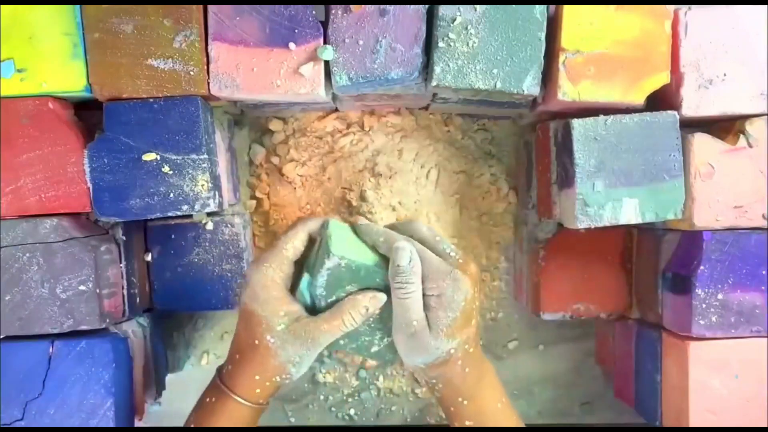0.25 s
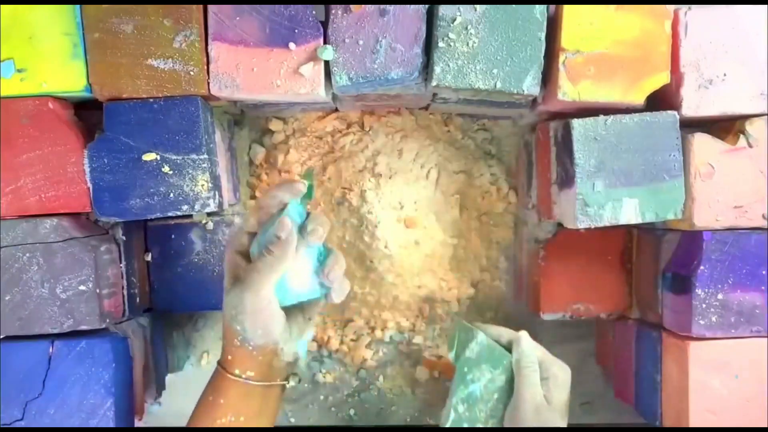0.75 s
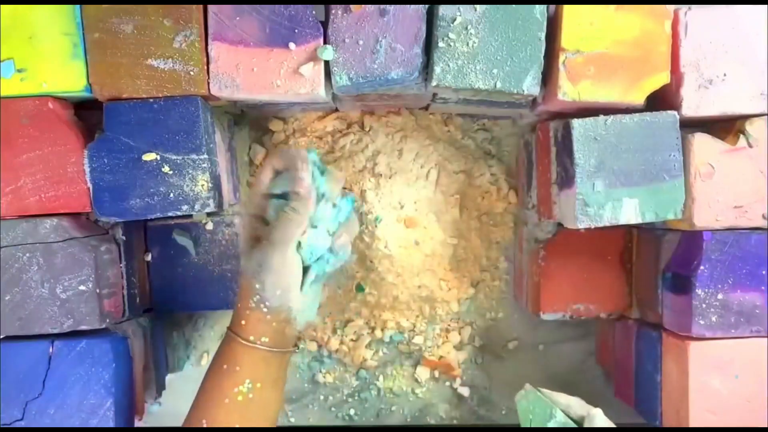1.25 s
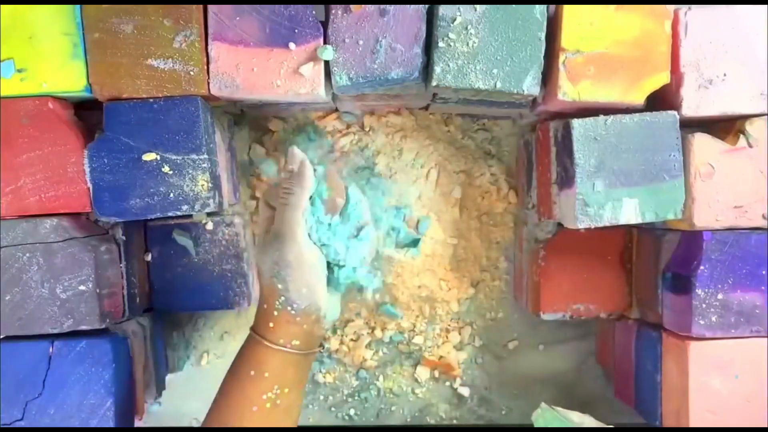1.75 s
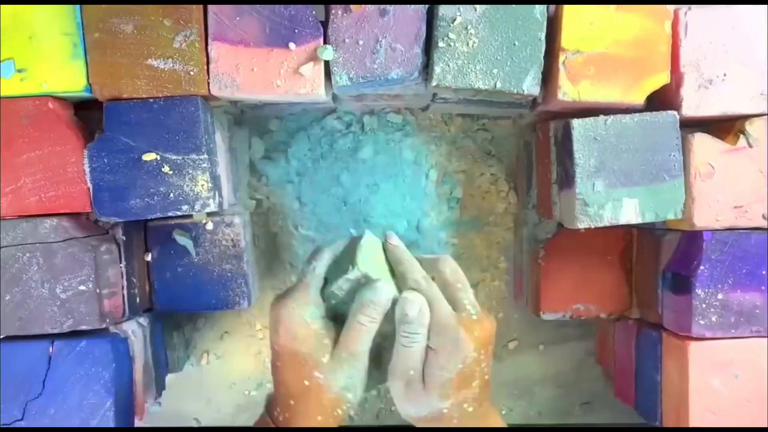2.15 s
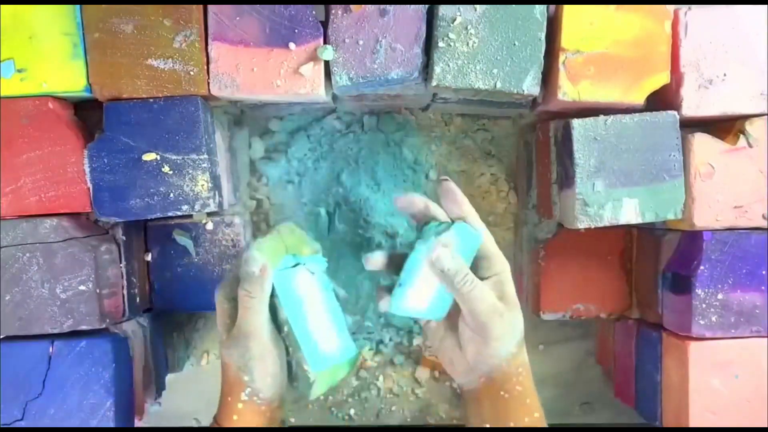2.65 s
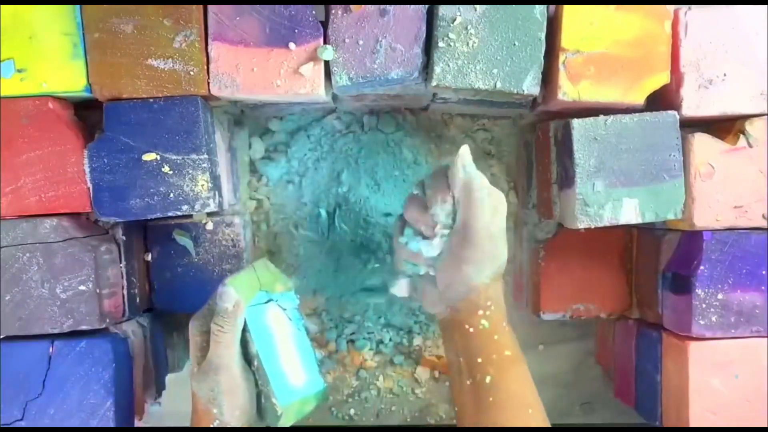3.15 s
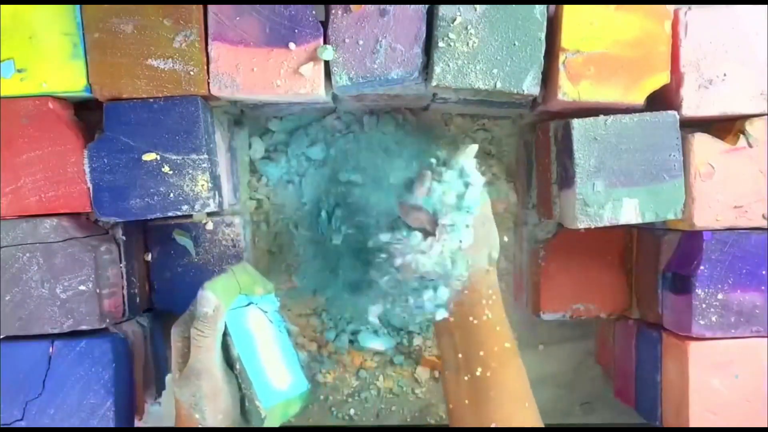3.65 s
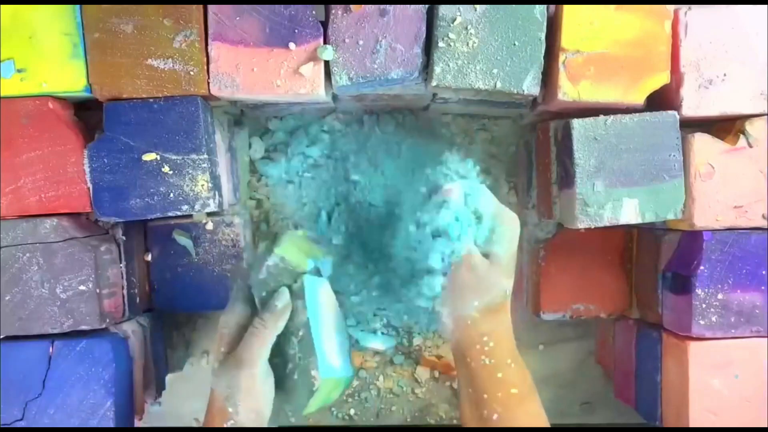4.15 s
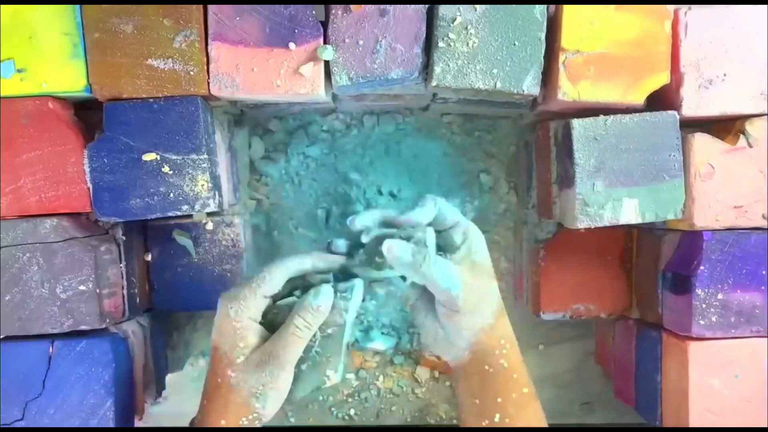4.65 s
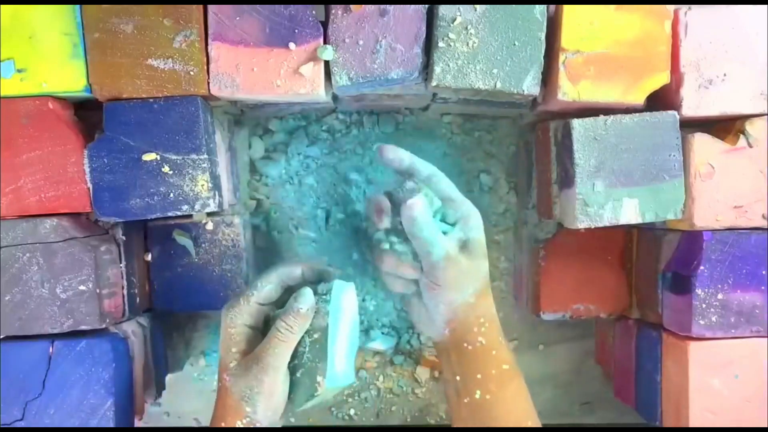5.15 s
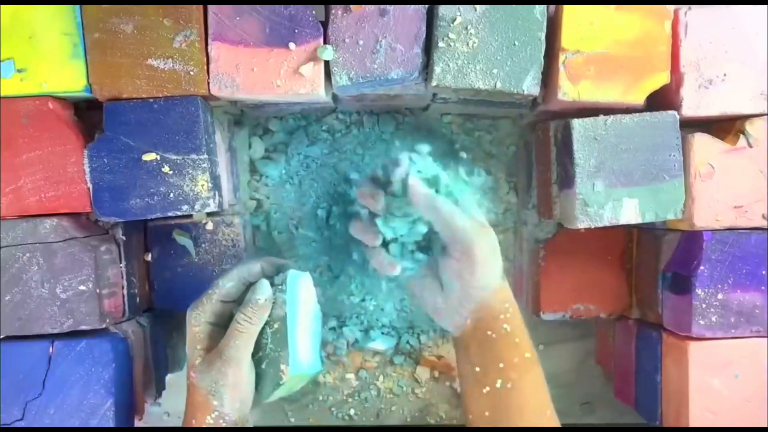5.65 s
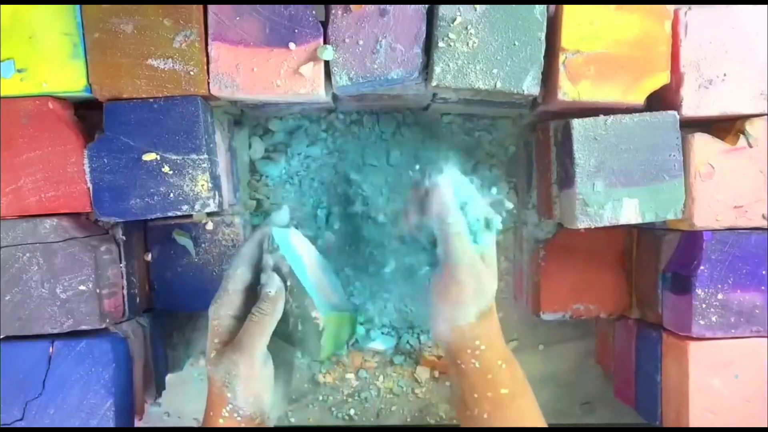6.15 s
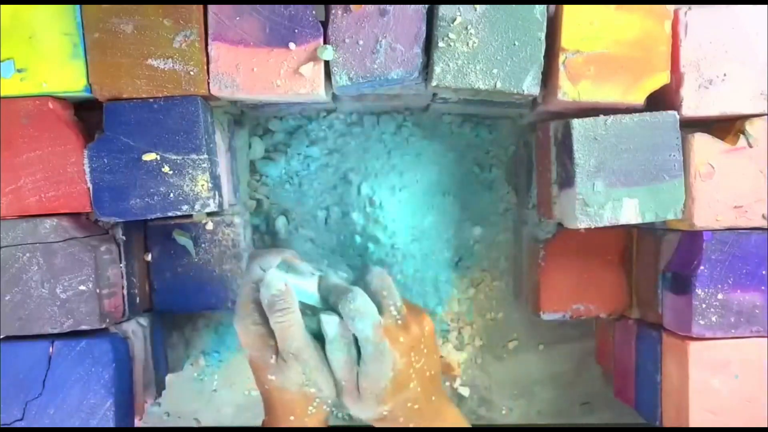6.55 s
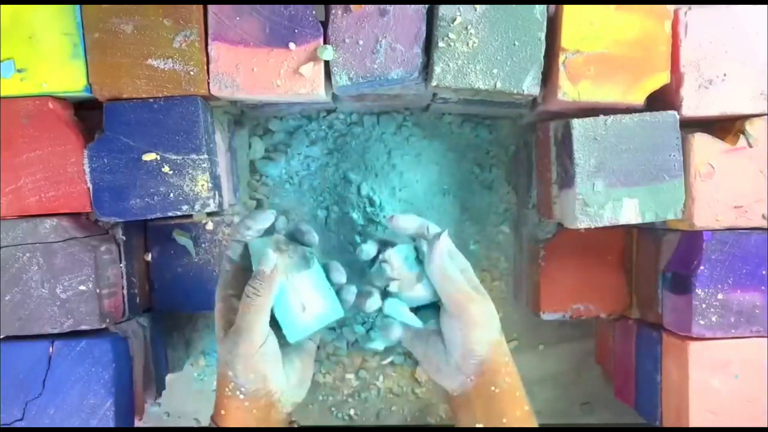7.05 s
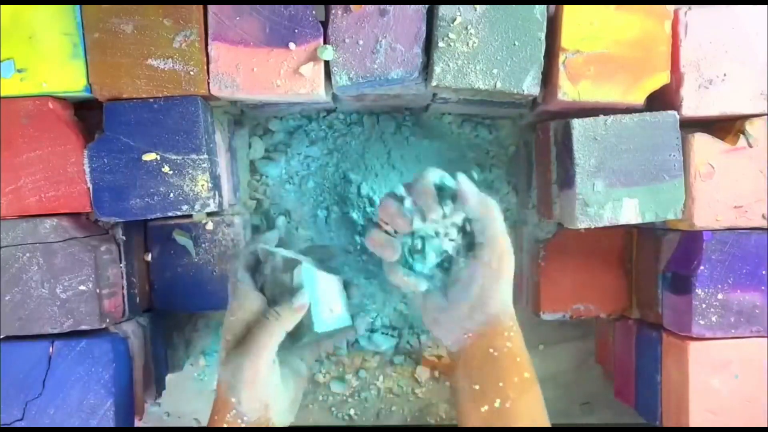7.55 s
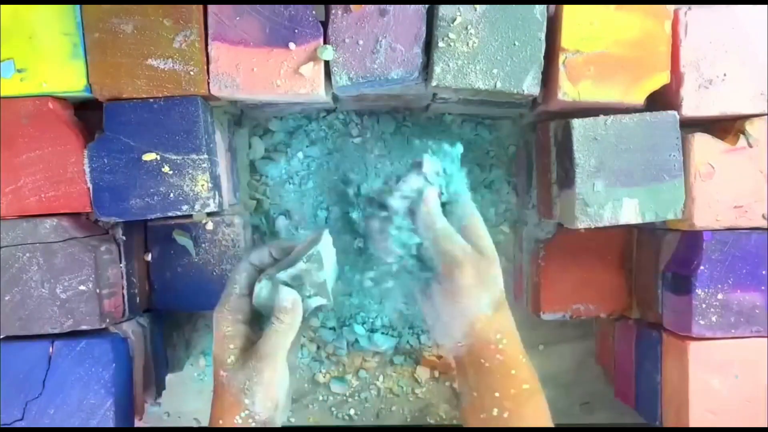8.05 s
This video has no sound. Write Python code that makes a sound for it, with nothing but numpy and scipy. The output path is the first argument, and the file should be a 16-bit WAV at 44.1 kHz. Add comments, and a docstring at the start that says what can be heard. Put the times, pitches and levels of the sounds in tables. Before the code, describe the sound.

Hands break and crush chalk in a quiet room, making sharp brittle snaps, irregular gritty crunches and a trickle of powder.

```python
"""Crushing chalk by hand

Dry chalk blocks are snapped and crushed over a table, close under a pair of microphone ports.
Each brittle fracture releases stored strain as a burst of grit and excites the modes of block and table.
Between fractures, crumbs grind and pour, and a slipping face sometimes squeaks. The cupped hands add
short reflections; the table rumbles under the arms, and a small quiet room sounds faintly behind."""
import sys
import numpy as np
from scipy import signal
from scipy.fft import rfft, irfft, next_fast_len
from scipy.io import wavfile

SR = 44100
rng = np.random.default_rng(int(sys.argv[2]) if len(sys.argv) > 2 else 0)


def to_wav(s):
    """Save 16-bit WAV."""
    ch = np.atleast_2d(s).T  # columns
    pcm = np.round(np.clip(ch, -1, 1) * 32767)  # PCM
    wavfile.write(sys.argv[1], SR, pcm.astype(np.int16))


N = 366030

# spectral density of the room's background: frequency_hz, relative_db
ROOM_SPECTRUM = [(18, -34), (30, -34.5), (101, -4.5), (325, -10.5), (515, -10), (742, -21), (2760, -13.5),
                 (6150, -19.5), (10000, -56), (13000, -63), (22000, -120)]
# hands and arms loading the table: time_s, level_db
RUMBLE_LEVELS = [(0.0, -52.5), (0.44, -64.5), (1.66, -60), (2.08, -63.5), (2.29, -55.5), (2.46, -63),
                 (2.53, -68), (2.77, -61), (3.05, -58), (3.28, -61.5), (4.23, -59), (5.39, -68),
                 (5.52, -71), (7.07, -71.5), (7.35, -63.5), (8.3, -63)]
# crumbs grinding and pouring: time_s, fine_db, coarse_db, lumps_db
CRUMBLE_LEVELS = [(0.0, -48, -40.5, -41), (0.055, -78, -74, -64), (0.11, -80, -66, -52),
                  (0.58, -74, -65, -61.5), (0.78, -60, -59.5, -63), (0.95, -51, -46, -56),
                  (1.16, -65, -57.5, -57), (1.62, -48, -55, -52), (1.92, -65, -51.5, -83),
                  (2.1, -52, -55, -52), (2.26, -75, -48, -56), (2.63, -54, -73, -65),
                  (2.89, -51.5, -58, -76), (3.03, -43, -34.5, -47), (3.26, -51.5, -48, -50.5),
                  (3.72, -63, -52, -52.5), (4.07, -49, -44.5, -58.5), (4.21, -44, -43, -72),
                  (4.39, -67, -55, -63), (4.76, -51, -50.5, -55), (4.87, -86, -63.5, -64.5),
                  (4.92, -41, -46, -54), (5.13, -85, -51, -56.5), (5.34, -38.5, -46, -55),
                  (5.55, -66, -46, -58.5), (5.625, -63, -55, -84), (5.67, -63, -55.5, -72),
                  (5.72, -63.5, -53, -69), (5.85, -60, -49.5, -62), (5.96, -55, -48, -67),
                  (6.2, -44, -49.5, -68), (6.56, -49.5, -62.5, -66.5), (6.91, -48, -58, -66),
                  (7.13, -48.5, -61, -60.5), (7.3, -42.5, -52.5, -68), (7.54, -51, -54, -55.5),
                  (7.67, -55, -49.5, -51), (7.79, -48, -44, -55), (7.87, -51.5, -60, -58),
                  (7.95, -46, -57.5, -83), (8.3, -60.5, -45.5, -54)]
# air in the pit between the stacked blocks: pitch_hz, gain_db, t60_s
PIT_MODES = [(404, -10, 0.069), (493, -7, 0.079), (537, -2.5, 0.12), (572, -1, 0.13)]
# sudden breaks: start_s, grit_db, coarse_re_grit_db, fine_re_grit_db, knock_db, thump_db, t60_s
SUDDEN_BREAKS = [(0.1396, -10, -8, -0.5, -10, -31, 0.12), (0.746, -36.5, -32, -2.5, -59, -63, 0.13),
                 (0.9046, -22.5, -27, -18, -38, -53, 0.098), (0.976, -28, -37, 1.5, -63, -65, 0.089),
                 (1.0411, -26, -9, -7, -44, -65, 0.052), (1.0957, -41, 4, -1, -43, -47, 0.19),
                 (1.1389, -26, -2.5, -3, -34, -37, 0.098), (1.236, -41, -28, -6, -51, -57, 0.05),
                 (1.287, -33.5, 5, -9, -67, -67, 0.042), (1.302, -26, -11, -7.5, -61, -45, 0.33),
                 (1.4264, -39.5, 7.5, -14, -38, -46, 0.11), (1.555, -35.5, -11, -8, -57, -58, 0.11),
                 (1.8074, -39, 1.5, -28, -67, -60, 0.05), (2.3033, -22.5, -23, 5, -51, -53, 0.2),
                 (2.317, -13, -11, -29, -15.5, -27.5, 0.12), (2.5033, -34.5, -19, 2, -59, -59, 0.088),
                 (2.5215, -36, -27, -4, -50, -66, 0.082), (2.845, -10, -15.5, -2, -24, -25, 0.084),
                 (2.903, -32.5, 5, -2, -44, -53, 0.034), (2.951, -15, -4, -6, -21, -27, 0.1),
                 (2.978, -24, -19, -9, -27, -48, 0.057), (2.981, -24, 0, -4, -39, -53, 0.052),
                 (3.02, -34.5, 11, 8, -58, -56, 0.026), (3.0636, -27.5, 2, 1.5, -26, -25, 0.21),
                 (3.0713, -30, 0, 5, -20, -32, 0.037), (3.185, -33, 1, -5, -34, -57, 0.038),
                 (3.207, -26.5, -6, 1.5, -40, -56, 0.11), (3.4514, -48.5, -3, 8, -43, -47, 0.17),
                 (3.468, -34, -12, 1.5, -44, -40, 0.21), (3.717, -38.5, -4, -11, -32, -52, 0.38),
                 (3.9182, -35, 3, -7, -36.5, -53, 0.064), (4.109, -30, -8.5, 1, -43, -62, 0.13),
                 (4.585, -39, -2.5, -11, -49, -55, 0.27), (4.897, -40, -5, -9, -67, -60, 0.25),
                 (4.998, -37, -15, 3, -60, -63, 0.32), (5.055, -35, -5.5, 0, -48, -45, 0.22),
                 (5.097, -30.5, -25, -19, -53, -50, 0.044), (5.1332, -35, -3.5, 3, -65, -66, 0.13),
                 (5.143, -42.5, 8, -14, -62, -60, 0.048), (5.201, -14, -3, -6, -23.5, -42, 0.054),
                 (5.276, -31, -22, 11.5, -66, -61, 0.064), (5.3117, -23.5, -14.5, -4, -63, -60, 0.065),
                 (5.3566, -14, -5, -3, -34, -40, 0.12), (5.441, -53, -37, 6.5, -46, -54, 0.052),
                 (5.7677, -41.5, 9, -31, -42, -52, 0.14), (6.0116, -43, 1, -12, -53, -75, 0.28),
                 (6.435, -34.5, -34, 3, -61, -67, 0.043), (6.4523, -38, -49, 5, -64, -70, 0.2),
                 (6.5918, -24.5, -39, -12.5, -77, -74, 0.037), (6.6082, -25.5, -43, -7, -76, -70, 0.13),
                 (6.641, -17, -24, 1, -61, -66, 0.04), (6.6586, -3, -17.5, -4, -36, -61, 0.05),
                 (6.6735, -14, -4.5, -5, -23, -40, 0.14), (6.8, -32.5, -20, -18, -62, -74, 0.076),
                 (7.0794, -38, -36, -6, -46.5, -55, 0.17), (7.223, -46.5, 4, -13, -53, -60, 0.091),
                 (7.244, -30.5, -39, 8, -68, -66, 0.064), (7.3025, -35, -31, -16, -67, -66, 0.25),
                 (7.3169, -37, -7.5, -4, -38.5, -48, 0.19), (7.339, -35, -16, 0, -63, -46, 0.11),
                 (7.4058, -31.5, 0.5, -19, -42, -55, 0.11), (7.436, -37.5, -4, -15, -52, -46, 0.14),
                 (7.4846, -27, -26, -11, -44, -62, 0.039), (7.629, -34, -15, -5, -48, -65, 0.17),
                 (7.688, -44.5, 10, -29, -40, -44, 0.043), (7.7365, -59, 15, -18, -50, -49, 0.04)]
# squeezes that build until the chalk gives way: peak_s, then the columns of SUDDEN_BREAKS from grit_db on
SLOW_BREAKS = [(0.0219, -38, -1.5, -2, -39, -59, 0.13), (0.4335, -32.5, -29, 1, -42, -68, 0.84),
               (0.5944, -46, -21, -3, -47, -61, 0.14), (0.6467, -58.5, 8, -16, -50, -40, 0.14),
               (0.7813, -32.5, -1.5, -33, -30, -51, 0.16), (0.815, -38, -27, 3, -44, -49, 0.11),
               (0.8797, -22, -7, -5.5, -27, -44, 0.11), (1.056, -35.5, -16, -4, -58, -56, 0.56),
               (1.109, -38.5, 2, -3, -37, -40, 0.21), (1.477, -39, -4, -20, -34, -42, 1),
               (1.616, -36.5, -2.5, -19, -39, -43, 0.3), (1.6685, -37.5, -1, -17, -23.5, -41, 0.26),
               (1.8554, -37.5, 2, -8, -40.5, -53, 0.26), (2.1035, -35, -4.5, -35, -34.5, -36, 0.76),
               (2.5367, -24, -30, -3, -57, -70, 0.16), (2.6604, -39, -34, 2.5, -45, -56, 0.17),
               (2.706, -48, -3, -18, -46, -54, 0.11), (2.861, -26.5, -19, -10, -35, -46, 0.25),
               (3.226, -28.5, -12.5, -7, -47, -48, 0.13), (3.517, -47.5, 5, 4, -43, -42, 0.77),
               (3.7814, -50.5, 2, -2, -36, -39, 0.22), (3.9717, -46, 10.5, -15, -32.5, -56, 0.17),
               (4.0318, -44, -1.5, 10, -42, -67, 0.28), (4.1798, -34, -17, 2, -33, -41, 0.99),
               (4.248, -38, -7, 1, -50, -62, 0.37), (4.2995, -23, -21, -2, -74, -60, 0.14),
               (4.4355, -37.5, -0.5, -23, -33.5, -48, 0.27), (4.5253, -42, -11, 4, -59, -48, 0.11),
               (4.5996, -38, -36, 6, -31.5, -46, 0.36), (4.657, -39.5, -14, -2, -61, -41, 0.73),
               (4.741, -33, -23, 3, -61, -70, 0.33), (4.967, -29, -10.5, -1, -58, -67, 0.15),
               (5.227, -23.5, -10, -0.5, -43, -47, 0.16), (5.4532, -29.5, -12.5, -2.5, -39, -66, 0.27),
               (6.022, -39, -7.5, -3, -38, -58, 0.25), (6.283, -35.5, -29, -12, -54, -64, 0.28),
               (6.4634, -34, -32, -6, -55, -75, 1), (6.84, -38, -20, -2, -73, -69, 0.46),
               (6.988, -28.5, -23.5, -0.5, -70, -69, 0.68), (7.1714, -30.5, -26, -7, -56, -56, 0.17),
               (7.518, -40, -5, -16, -53, -65, 0.29), (7.76, -33.5, -8, -6, -42, -51, 0.29),
               (7.9219, -40.5, -2, -7, -33.5, -56, 0.89), (8.221, -56, 13, -21, -40.5, -56, 0.93)]
# small chalk pieces: pitch_hz, gain_db, t60_s
PIECE_MODES = [(773, -5.5, 0.005), (1020, 9, 0.0081), (1678, 7, 0.023), (1984, 20.5, 0.0032),
               (2690, 4, 0.0048)]
# the block in the hands: pitch_hz, gain_db, t60_s
BLOCK_MODES = [(291, -7, 0.13), (387, -14.5, 0.088), (406.5, 0.5, 0.072), (490, -7.5, 0.1),
               (745, -2, 0.026), (976, -2, 0.022), (1132, -3.5, 0.051)]
# the table top: pitch_hz, gain_db, t60_s
TABLE_MODES = [(74, -17, 0.17), (119, -4.5, 0.1), (156.5, -4, 0.091), (198, 5, 0.082)]
# brittle snaps: start_s, peak_db, pitch_hz, t60_s
BRITTLE_SNAPS = [(0.1396, -6, 9500, 0.025), (0.7467, -28, 13400, 0.027), (0.7784, -27.5, 3160, 0.019),
                 (0.8, -25, 13900, 0.027), (0.8765, -27, 3380, 0.03), (0.9774, -19.5, 8620, 0.022),
                 (1.04, -29, 4830, 0.027), (1.0969, -45, 5600, 0.02), (1.1425, -19, 3570, 0.063),
                 (1.235, -39, 7300, 0.027), (1.3005, -32, 7050, 0.027), (1.5563, -22.5, 8600, 0.015),
                 (1.804, -28, 3340, 0.025), (1.8515, -40, 6800, 0.02), (2.3158, 2, 12300, 0.021),
                 (2.3164, -2.5, 4470, 0.023), (2.5233, -20, 7300, 0.051), (2.8473, -2, 3200, 0.082),
                 (2.9497, -12.5, 6360, 0.022), (2.977, -12, 3170, 0.025), (3.021, -23, 3240, 0.027),
                 (3.07, -14.5, 3640, 0.027), (3.205, -18, 13600, 0.027), (3.4517, -25, 14300, 0.027),
                 (3.4712, -19, 8550, 0.027), (3.9177, -36, 2820, 0.024), (4.094, -36, 9490, 0.027),
                 (4.1126, -20.5, 9350, 0.024), (4.286, -26, 6000, 0.027), (4.999, -23, 8050, 0.021),
                 (5.13, -25, 13200, 0.027), (5.143, -22, 2020, 0.017), (5.201, -20, 2720, 0.035),
                 (5.224, -12, 14400, 0.027), (5.274, -16.5, 9500, 0.025), (5.3063, -21, 8000, 0.029),
                 (5.3572, -17.5, 8200, 0.027), (5.443, -10.5, 14500, 0.015), (5.768, -32, 2770, 0.024),
                 (6.451, -17, 8200, 0.046), (6.608, -17.5, 7660, 0.02), (6.6424, -11, 3600, 0.027),
                 (6.6582, 1.5, 8700, 0.017), (7.077, -24.5, 6400, 0.052), (7.166, -30, 7000, 0.02),
                 (7.2424, -22, 6950, 0.041), (7.2535, -25, 7500, 0.02), (7.299, -20, 6200, 0.046),
                 (7.3172, -36, 790, 0.011), (7.3403, -24, 7000, 0.027), (7.354, -28, 7000, 0.022),
                 (7.408, -35, 3670, 0.027), (7.436, -31.5, 990, 0.017), (7.4844, -38, 6240, 0.027),
                 (7.5194, -45, 7630, 0.027), (7.629, -23.5, 7360, 0.027), (7.7356, -32, 1300, 0.01),
                 (7.7588, -24.5, 3200, 0.04), (7.777, -31, 4700, 0.027)]
# heavy breaks jerking the hands against the table: start_s, thud_db, initial_pitch_hz, t60_s, piece_db
HAND_THUDS = [(0.1411, -13.5, 220, 0.075, -14.5), (2.32, -21.5, 215, 0.11, -39),
              (2.5, -42.5, 119, 0.17, -64), (2.538, -47, 148, 0.12, -62), (2.846, -25.5, 248, 0.052, -46),
              (2.9023, -43, 250, .05, -27), (2.95, -23.5, 270, 0.076, -10.5),
              (2.983, -28, 270, 0.043, -15.5), (3.022, -44, 270, .05, -27),
              (3.0695, -13.5, 290, 0.067, -16), (5.201, -27, 300, 0.05, -16.5),
              (5.357, -42, 302, 0.041, -37), (6.674, -28, 395, 0.071, -21)]
# chalk faces singing as they slip: start_s, length_s, pitch_hz, level_db
SLIPS = [(1.126, 0.036, 1715, -24.5), (6.962, 0.067, 4520, -36.5), (6.996, 0.089, 2720, -50),
         (7.069, 0.039, 2700, -52)]
# phase of the left port ahead of the right: frequency_hz, lead_rad
PORT_LEAD = [(0, 0), (250, .4), (800, .6), (1600, 0), (3000, 1), (4500, 0), (8000, 0), (11100, -np.pi),
             (13800, -2 * np.pi)]
# level difference between the ports: frequency_hz, left_re_right_db
PORT_TILT = [(60, -4), (200, -1), (400, 0.5), (1500, 2.5), (3000, -0.5), (5500, 5.5), (9000, 0.9),
             (15000, -0.5)]
# grains that only one port hears: frequency_hz, own_re_shared_db
PORT_OWN_SHARE = [(60, -13.5), (300, -5.5), (900, -0.5), (1500, 10), (6500, 20), (9000, 28), (11100, -14),
                  (13000, -7.5)]
# frequency response of the microphone: frequency_hz, gain_db
MIC_RESPONSE = [(30, 2.5), (70, 4), (200, -0.5), (500, 3.5), (1200, -3), (2500, -3), (5000, -4),
                (8500, 1.5), (11000, -3), (15600, -7), (16000, -19), (16700, -13)]

ROOM_DB = -66.5
SHUDDER_DB, SHUDDER_T60_S = -18.5, 0.29   # the table shakes on after each thump
SUDDEN_CREAK_DB, SLOW_CREAK_DB = -19.5, -6.5   # strength of the creak ahead of a break
CREAK_T60_S, CREAK_PER_DECAY = 0.021, 0.32   # the build-up is longer for breaks that decay slowly
BREAK_RISE_S, GRIND_DB = 0.00036, -14   # time to run through the block; grinding re the knock
SNAP_TEARS_PER_S, SNAP_CLICK = 9000, 1.6   # rate of the small tears; size of the leading one
SNAP_BAND_RATIO, SNAP_RISE_S = 1.57, 0.00013   # the band extends by this ratio either side of the pitch
SNAP_DECAY_POWER = 1.15   # above 1 a snap holds briefly, then stops short
THUD_SAG, THUD_SAG_S, THUD_RISE_S = 0.333, 0.01245, 0.0034   # pitch sinks to the share THUD_SAG
PIECE_HZ, PIECE_T60_S = 968, 0.053
BLOCK_HZ, BLOCK_T60_S, BLOCK_DB = 387, 0.052, 2   # level re the thud
CUP_DB, CUP_T60_S = -5, .014   # reflections re the direct sound
STOPBAND_HZ = 16900


def amp(db):
    """Amplitude ratio of a level in decibels."""
    return 10 ** (np.asarray(db) / 20)


def unit_rms(x):
    """Normalisation to unit mean power."""
    return x / np.sqrt(np.mean(x ** 2) + 1e-20)


def in_time(rows):
    """Linear interpolation of each level column at every sample."""
    times, *columns = np.transpose(rows)
    return [np.interp(np.arange(N) / SR, times, column) for column in columns]


def at_hz(points, hz):
    """Interpolation of a spectrum on a logarithmic frequency axis."""
    knots_hz, level_db = np.transpose(points)
    return np.interp(np.log(hz + 1), np.log(knots_hz + 1), level_db)


def band(x, low_hz, high_hz, passes=1):
    """Butterworth band-pass; each pass steepens the skirts."""
    sos = signal.butter(2, [low_hz, min(high_hz, .45 * SR)], "band", fs=SR, output="sos")
    for _ in range(passes):
        x = signal.sosfilt(sos, x)
    return x


def drift(rate_hz):
    """Low-passed noise: a slow random fluctuation of unit rms."""
    knots_per_s = 200
    noise = rng.standard_normal(int(N / SR * knots_per_s))
    pole = np.exp(-2 * np.pi * rate_hz / knots_per_s)
    knots = unit_rms(signal.lfilter([1], [1, -pole], noise))
    return np.interp(np.linspace(0, len(knots) - 1, N), np.arange(len(knots)), knots)


def grit(per_s, spread_db):
    """Tiny fractures as a Poisson process, most small, a few large; rows: both ports, left, right."""
    sizes = amp(spread_db * np.minimum(rng.exponential(1, (3, N)), 4)) * rng.choice([-1, 1], (3, N))
    return unit_rms(sizes * (rng.random((3, N)) < per_s / SR))


def ring(x, modes, uneven_db):
    """Superposition of damped modes; the excitation of each varies as the grip moves."""
    out = 0
    for hz, gain_db, t60 in modes:
        radius, angle = amp(-60 / (t60 * SR)), 2 * np.pi * hz / SR
        struck = x * amp(gain_db + uneven_db * drift(1.9)) + 1e-18
        out = out + signal.lfilter([0, np.sin(angle)], [1, -2 * radius * np.cos(angle), radius ** 2], struck)
    return out


def breaks():
    """Brittle failure, sudden or slow: one row of time, levels and decay for each break."""
    rows = [(*row, SUDDEN_CREAK_DB) for row in SUDDEN_BREAKS]
    rows += [(*row, SLOW_CREAK_DB) for row in SLOW_BREAKS]
    peak_s, grit_db, coarse_db, fine_db, knock_db, thump_db, t60, creak_db = np.transpose(rows)
    three_grits_db = grit_db + coarse_db, grit_db, grit_db + fine_db
    return np.transpose([peak_s, thump_db, knock_db, *three_grits_db, creak_db, t60])


def room_tone():
    """Stationary background noise, uncorrelated between the ports."""
    gain = amp(at_hz(ROOM_SPECTRUM, np.fft.rfftfreq(N, 1 / SR)))
    return amp(ROOM_DB) * unit_rms(irfft(rfft(rng.standard_normal((2, N))) * gain, N))


def table_rumble():
    """Forced vibration of the table under the arms, with an exponential shudder after each thump."""
    load_db, = in_time(RUMBLE_LEVELS)
    peak_s, thump_db = breaks().T[:2]
    jolts = np.zeros(N)
    jolts[(peak_s * SR).astype(int)] = amp(thump_db + SHUDDER_DB)
    shudder = signal.lfilter([1], [1, -amp(-60 / (SHUDDER_T60_S * SR))], jolts)
    noise = unit_rms(band(rng.standard_normal((3, N)), 55, 170))
    return noise * (amp(load_db) + shudder) * amp(2.5 * drift(8))


def crumble():
    """Granular flow: many small impacts merge into hiss and crunch; falling lumps excite the pit."""
    fine_db, coarse_db, lumps_db = in_time(CRUMBLE_LEVELS)
    clumps = drift(25)
    powder = rng.standard_normal((3, N)) + 0.6 * grit(per_s=500, spread_db=5.5)
    fine = unit_rms(band(powder, 2170, 14800)) * amp(fine_db + 2.0 * clumps)
    coarse = unit_rms(band(powder, 1000, 5350)) * amp(coarse_db + 1.4 * clumps)
    drops = grit(per_s=500, spread_db=4.0) * amp(clumps + 2.0 * drift(2.2))
    hollow = .8 * unit_rms(ring(drops, PIT_MODES, uneven_db=2.0))
    patter = .6 * unit_rms(band(drops, 300, 700))
    return fine + coarse + unit_rms(patter + hollow) * amp(lumps_db)


def strain_release():
    """Each break builds, clicks and decays exponentially: four grit envelopes and two contact forces."""
    envelopes, forces = np.zeros((4, N + SR)), np.zeros((2, N + SR))
    t = np.arange(SR // 4) / SR
    click = np.array([[.6], [.4], [.6], [.9]]) * amp(-60 * t / 0.011)
    crumbling = 0.029 * amp(-60 * t / 0.31)   # the broken faces go on shedding
    jolt = np.array([t / 0.0011 * np.exp(-t / 0.0014), amp(-60 * t / 0.0017)])   # arm's shove, block's knock
    for peak_s, thump_db, knock_db, coarse_db, medium_db, fine_db, creak_db, t60 in breaks():
        at = round(peak_s * SR)
        levels = amp([[coarse_db], [medium_db], [fine_db], [knock_db + GRIND_DB]])
        sudden = 1 - amp(creak_db)   # a break without warning clicks hardest
        rise = 1 - sudden * np.exp(-t / BREAK_RISE_S)
        shower = amp(-60 * t / np.clip(t60, .01, .25))
        envelopes[:, at:at + len(t)] += levels * rise * (sudden * click + shower + crumbling)
        lead = min(at, SR // 8)
        creak = amp(creak_db + 3.5 - 60 * t[lead:0:-1] / (CREAK_T60_S + CREAK_PER_DECAY * t60))
        envelopes[:, at - lead:at] += levels * creak
        forces[:, at:at + len(t)] += amp([[thump_db], [knock_db]]) * jolt * [[1], [sudden]]
    return envelopes[:, :N], forces[:, :N]


def fractures():
    """Impulsive excitation: each break sheds grit in three sizes and rings pieces, block and table."""
    envelopes, (table_force, block_force) = strain_release()
    coarse, medium, fine, grinding = envelopes[:, None] * grit(per_s=7000, spread_db=4.0)
    pieces = amp(-35.5) * band(ring(coarse, PIECE_MODES, uneven_db=3.0), 270, 4700)
    crunch = amp(7.0) * band(coarse, 714, 1510)
    bright = amp(1.5) * band(medium, 2490, 7640, passes=2) + amp(1.0) * band(fine, 11080, .45 * SR)
    rough_contact = np.array([[1.2], [.8], [-.8]]) + .7 * rng.standard_normal((3, N))
    knock = amp(-25.0) * ring(block_force * rough_contact + grinding, BLOCK_MODES, uneven_db=2.5)
    shove = table_force * [[1], [1], [-1]]   # the table flexes differently under each port
    thump = amp(-36) * ring(shove, TABLE_MODES, uneven_db=-5.5)
    # knock stays above about 200 Hz and thump above about 65 Hz, with steep skirts
    bodies = band(knock, 206, 3400, passes=2) + band(thump, 65, 590, passes=2)
    return pieces + crunch + bright + bodies


def snaps():
    """Fast crack growth in a dry piece: one sharp tear, then smaller ones, in a band around its pitch."""
    out, t = np.zeros((3, N + SR)), np.arange(SR // 10) / SR
    rise = 1 - np.exp(-t / SNAP_RISE_S)
    for start_s, peak_db, hz, t60 in BRITTLE_SNAPS:
        tears = rng.standard_normal((3, len(t))) * (rng.random((3, len(t))) < SNAP_TEARS_PER_S / SR)
        tears[:, round(2 * SNAP_RISE_S * SR)] = SNAP_CLICK
        decay = amp(-60 * (t / t60) ** SNAP_DECAY_POWER)
        burst = band(tears * rise * decay, hz / SNAP_BAND_RATIO, hz * SNAP_BAND_RATIO, passes=2)
        at = round(start_s * SR)
        out[:, at:at + len(t)] += amp(peak_db) * burst / np.abs(burst).max(axis=1).mean()
    return out[:, :N]


def thuds():
    """Soft impact: the pitch sinks as the contact spreads, while block and held piece ring briefly."""
    out, t = np.zeros(N + SR), np.arange(SR // 4) / SR
    rise = 1 - np.exp(-t / THUD_RISE_S)
    cycles_per_hz = THUD_SAG * t + (1 - THUD_SAG) * THUD_SAG_S * (1 - np.exp(-t / THUD_SAG_S))
    piece = np.sin(2 * np.pi * PIECE_HZ * t) * amp(-60 * t / PIECE_T60_S)
    block = np.sin(2 * np.pi * BLOCK_HZ * t) * amp(BLOCK_DB - 60 * t / BLOCK_T60_S) * rise
    for start_s, thud_db, hz, t60, piece_db in HAND_THUDS:
        thud = np.sin(2 * np.pi * hz * cycles_per_hz) * amp(-60 * t / t60) * rise
        at = round(start_s * SR)
        out[at:at + len(t)] += amp(thud_db) * (thud + block) + amp(piece_db) * piece
    return band(out[:N], 45, 3000) * [[1], [.3], [-.3]]


def squeaks():
    """Friction noise filtered by one narrow resonance, swelling and fading as a face slips."""
    out, t = np.zeros((3, N + SR)), np.arange(SR // 8) / SR
    for start_s, length_s, hz, level_db in SLIPS:
        swell = np.sin(np.pi * np.clip(t / length_s, 0, 1)) ** 2
        tone = band(rng.standard_normal((3, len(t))), hz - 30.0, hz + 30.0)
        at = round(start_s * SR)
        out[:, at:at + len(t)] += amp(level_db) * swell * unit_rms(tone)
    return out[:, :N]


def cupped_hands(x):
    """Interference with early reflections off hands and blocks, renewed every 46 ms as the hands move."""
    hop = 2048
    size = 4 * hop
    t, out = np.arange(2 * hop) / SR, np.zeros((3, N + 6 * hop))
    x, fade = np.pad(x, ((0, 0), (hop, 2 * hop))), signal.get_window("hann", 2 * hop)
    reflectance = 1 / (1 + (600 / (np.fft.rfftfreq(size, 1 / SR) + 1)) ** 2)   # too small to reflect bass
    for i in range(0, N + hop, hop):
        echoes = rng.standard_normal((3, len(t))) * amp(-60 * t / CUP_T60_S)
        echoes = amp(CUP_DB) * echoes / np.sqrt(np.sum(echoes ** 2, axis=1, keepdims=True))
        direct = rfft(x[:, i:i + 2 * hop] * fade, size)
        out[:, i:i + size] += irfft(direct * (1 + reflectance * rfft(echoes, size)), size)
    return out[:, hop:hop + N] / np.sqrt(1 + amp(2 * CUP_DB))


def ports(x):
    """Partial coherence: both ports hear the shared row, the left shifted in phase; each adds its own."""
    size = next_fast_len(N + 4096)
    hz = np.fft.rfftfreq(size, 1 / SR)
    shared, *own = rfft(x, size)
    left_lead = np.interp(hz, *np.transpose(PORT_LEAD))
    phase = np.array([np.exp(1j * left_lead), np.ones(len(hz))])
    share = amp(at_hz(PORT_OWN_SHARE, hz))
    balance = amp(at_hz(PORT_TILT, hz) / 2 * np.array([[1], [-1]]))
    heard = (shared * phase + share * np.array(own)) * balance / np.sqrt(1 + share ** 2)
    return irfft(heard, size)[:, :N]


def scene():
    """Superposition of chalk, table and room at the two ports."""
    in_hands = cupped_hands(fractures() + crumble() + squeaks())
    return ports(in_hands + snaps() + thuds() + table_rumble()) + room_tone()


def record(dry):
    """Transduction: the microphone colours the sound, clips near full scale and cuts the top treble."""
    response = amp(at_hz(MIC_RESPONSE, np.fft.rfftfreq(N, 1 / SR)))
    coloured = irfft(rfft(dry) * response, N)
    low_pass = signal.cheby2(12, 70, STOPBAND_HZ, fs=SR, output="sos")
    return signal.sosfilt(low_pass, np.clip(coloured, -.9, .9))


dry = scene()
out = record(dry)
to_wav(out)
```